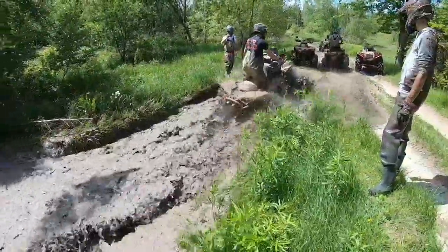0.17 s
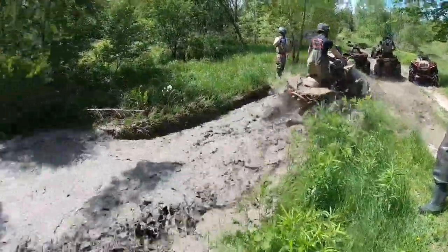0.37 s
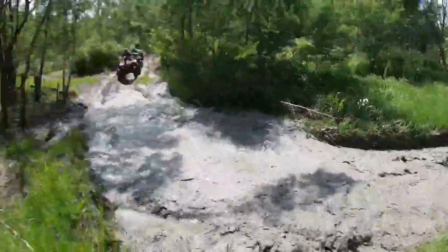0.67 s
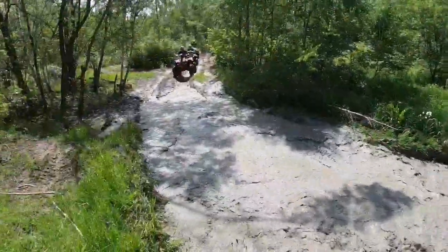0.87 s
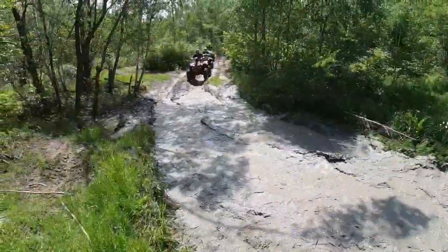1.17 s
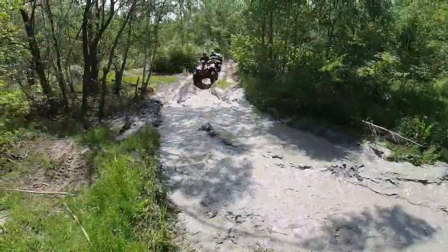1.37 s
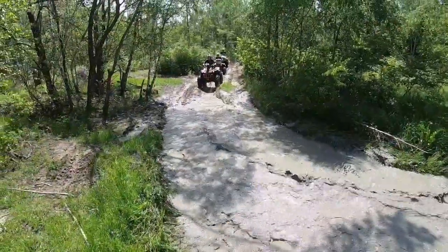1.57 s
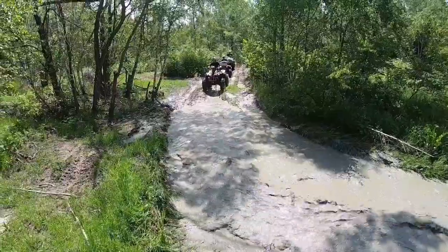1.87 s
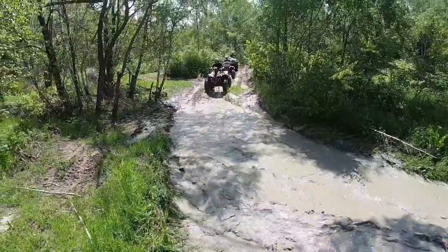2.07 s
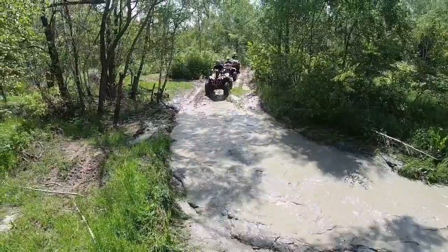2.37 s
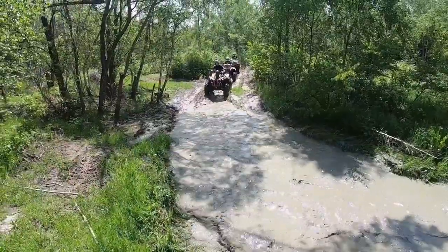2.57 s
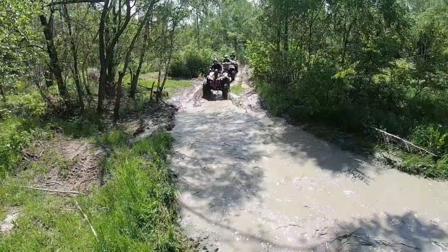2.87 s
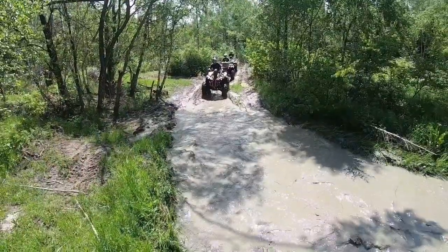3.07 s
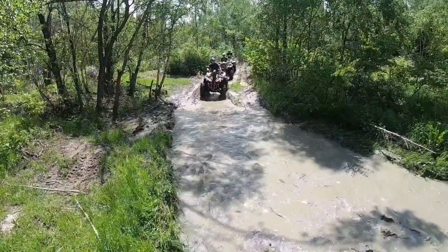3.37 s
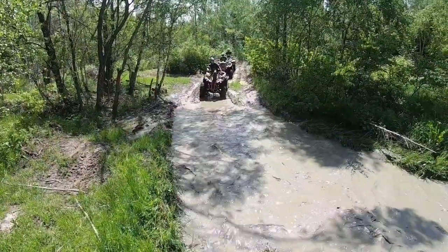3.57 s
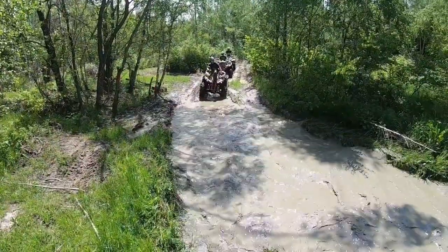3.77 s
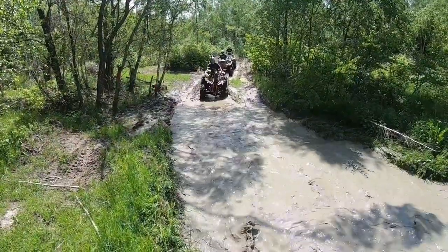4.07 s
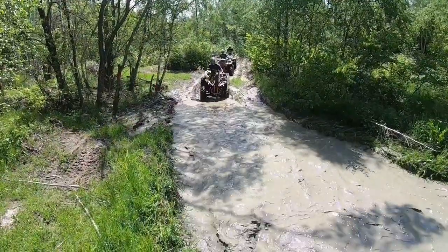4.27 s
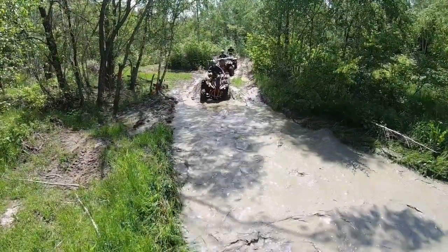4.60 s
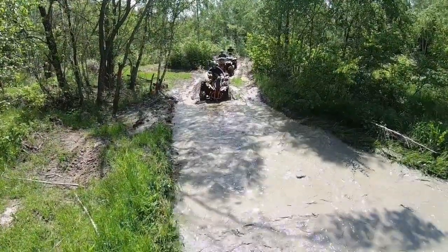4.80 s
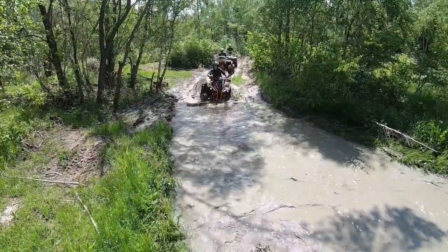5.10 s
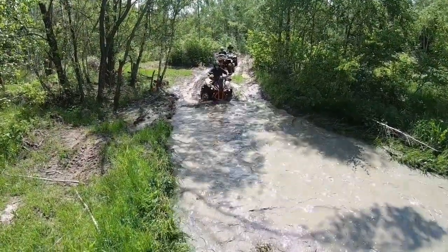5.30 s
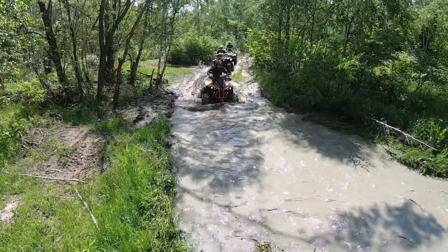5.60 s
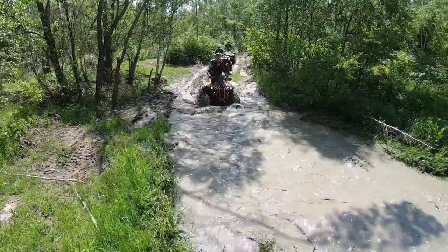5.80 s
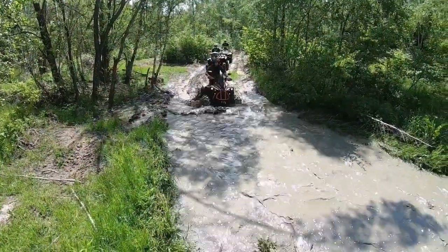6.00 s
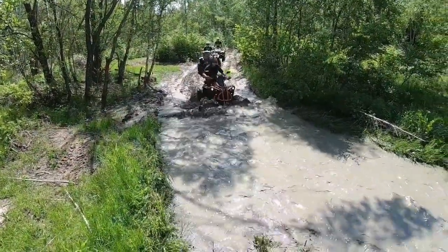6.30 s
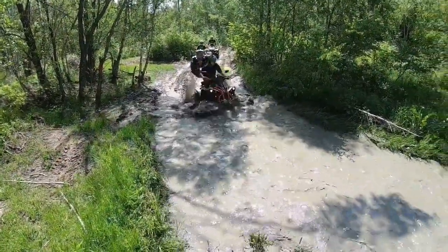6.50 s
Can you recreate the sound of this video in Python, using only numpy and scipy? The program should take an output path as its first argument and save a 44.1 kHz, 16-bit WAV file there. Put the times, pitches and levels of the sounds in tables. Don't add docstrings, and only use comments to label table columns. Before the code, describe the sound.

Heard through a small stereo camera: one twin-cylinder quad climbs in pitch to a cracking bark, then lets off and settles. Several engines lump along together, deep and fluttering, with missed beats, brief throttle blips and faint bright valve ticks. Near the end the approaching quad revs in waves and charges, its exhaust growing raspy as wheels churn mud and spray. Open air, only slight echoes from ground and trees.

```python
import sys
import numpy as np
from scipy import signal
from scipy.fft import rfft, irfft
from scipy.io import wavfile
from scipy.ndimage import uniform_filter1d

SR = 44100
rng = np.random.default_rng(int(sys.argv[2]) if len(sys.argv) > 2 else 0)


def file_out(sig):
    cols = np.atleast_2d(sig).T
    lim = np.clip(cols, -1, 1)
    pcm = np.round(lim * 32767).astype(np.int16)
    wavfile.write(sys.argv[1], SR, pcm)


def linear_from_db(decibels):
    return 10 ** (np.asarray(decibels, float) / 20)


N = 293265

# frequency in Hz, level in dB per Hz.
EXHAUST_SPECTRUM = [(15, -80), (25, -37.5), (56, 4), (107, 2), (195, 0.5), (237, -14.5), (301, -7.5),
                    (340, -18.5), (472, -18.5), (619, -45.5), (900, -39), (1170, -59), (1980, -120)]
# time in seconds, roughness from 0 to 1.
ROUGHNESS = [(0, .05), (.55, .05), (.7, .1), (1.0, .11), (2.55, .11), (2.8, .13), (2.92, .07), (3.15, .07),
             (3.3, .14), (3.6, .15), (3.8, .11), (4.15, .1), (4.3, .11), (4.8, .07), (5.35, .06),
             (5.5, .09), (6.0, .08), (6.3, .06), (6.65, .05)]


def rms_one(x):
    return x / np.sqrt(np.mean(x ** 2) + 1e-20)


def evened(x):
    return x / np.sqrt(uniform_filter1d(x ** 2, size=9000) + 1e-20)


def in_time(rows):
    s, *columns = np.transpose(rows)
    return [np.interp(np.arange(N) / SR, s, c) for c in columns]


def curve(rows):
    return in_time(rows)[0]


def at_hz(points, hz):
    known_hz, value = np.array(points).T
    return np.interp(np.log(hz), np.log(known_hz), value)


def drift(rate):
    r = np.exp(-80 * np.pi * rate / SR)
    slow = signal.lfilter([1], [1, -2 * r, r * r], rng.standard_normal(N // 40 + 2002))[2000:]
    return np.interp(np.arange(N) / 40, np.arange(len(slow)), rms_one(slow))


def butter(x, hz, kind, order=2):
    return signal.sosfilt(signal.butter(order, hz, kind, fs=SR, output="sos"), x)


def resonance(x, hz, width):
    r = np.exp(-np.pi * width / SR)
    feedback = [1, -2 * r * np.cos(2 * np.pi * hz / SR), r * r]
    return signal.lfilter(np.array([1, 0, -1]) * (1 - r * r) / 2, feedback, x + 1e-18)


def causal_colour(x, spectrum):
    size = 2 ** 15
    hz = np.maximum(np.arange(size // 2 + 1) * SR / size, 1)
    cepstrum = irfft(np.log(linear_from_db(at_hz(spectrum, hz))))
    cepstrum[1:size // 2] *= 2
    cepstrum[size // 2 + 1:] = 0
    return signal.fftconvolve(x, irfft(np.exp(rfft(cepstrum)))[:size // 2])[:N]


def band_rms(x, low_hz, high_hz):
    return np.std(butter(np.mean(x, axis=0), [low_hz, high_hz], "band", order=4))


def mist(level_db):
    mid, side = butter(rng.standard_normal((2, N)), [9800, 14300], "band", order=4)
    return linear_from_db(level_db + 1.5 * drift(20)) * rms_one(mid + .65 * side * [[1], [-1]])


def hiss(puffs, mud_db, spray_db, patchy_db, gate):
    # frequency in Hz, level in dB per Hz.
    hiss_spectrum = [(350, -29), (600, -2.5), (719, -2), (872, -9), (948, -4.5), (1100, -12), (1220, -4.5),
                     (1500, -5), (1910, -7.5), (2260, -6.5), (2490, -11.5), (2840, -7.5), (3700, -15),
                     (6210, -12.5), (8500, -12), (10700, -26.5), (13900, -57), (22000, -120)]
    # frequency in Hz, left-right likeness up to 1.
    likeness = [(60, 0.98), (130, 0.99), (260, 0.99), (540, 0.37), (1130, 0.42), (2360, 0.4), (4910, 0.18),
                (7500, 0.3), (10200, 0.24)]
    # frequency in Hz, left minus right in dB.
    left_lean = [(60, -1.0), (140, -0.5), (330, 0.5), (780, -1), (1840, -1.2), (4340, 2.7), (10200, -0.5)]
    mud, spray, together = 0, 0, drift(18)
    edges = 560 * 2 ** np.arange(0, 4.5, 1 / 3)
    white = rng.standard_normal((2, 2, N))
    for k, (low, high) in enumerate(zip(edges, edges[1:])):
        mid, side = butter(white[k % 2], [low, high], "band")
        hz = np.sqrt(low * high)
        alike = np.clip(at_hz(likeness, hz), -.95, .95)
        lean = linear_from_db(at_hz(left_lean, hz) * 0.43 * np.array([[1], [-1]]))
        gain = linear_from_db(at_hz(hiss_spectrum, hz) + patchy_db * (0.83 * together + drift(39)))
        band = gain * lean * (np.sqrt(1 + alike) * mid + np.sqrt(1 - alike) * side * [[1], [-1]])
        upper = np.clip(np.log2(hz / 3500), 0, 1)
        mud = mud + (1 - upper) * band
        spray = spray + upper * band
    mud, spray = butter(np.array([mud, spray]), 10800, "low", order=12)
    swell = 1 + gate * puffs
    both = linear_from_db(mud_db) * mud / band_rms(mud, 814, 6800)
    both = both + linear_from_db(spray_db) * spray / band_rms(spray, 5000, 11000)
    return both * swell / np.sqrt(np.mean(swell ** 2))


def from_the_right(pair):
    # time in seconds, share from 0 to 1.
    aside_rows = [(0, 0), (.55, 0), (.85, 1), (4.5, 1), (5.9, .6), (6.2, 0), (6.65, 0)]
    lag_s, lean_db = .00038, -6.5
    aside = curve(aside_rows)
    late = np.interp(np.arange(N) - np.round(aside * lag_s * SR), np.arange(N), pair[0])
    return np.array([late, pair[1]]) * linear_from_db(lean_db * aside * [[.5], [-.5]])


def ticks():
    # first tick in seconds, number of ticks, seconds between ticks, peak in dB.
    spells = [
        (1.2384, 1, .096, -30.5),
        (2.3785, 2, .09, -38),
        (2.5985, 1, .096, -41.5),
        (2.9514, 1, .096, -34),
        (3.481, 1, .096, -46.5),
        (3.6107, 13, .0955, -40),
        (5.238, 6, .0985, -44),
        (6.287, 1, .096, -45),
    ]
    spread_db, length = 2.5, 90
    clicks = np.zeros(N)
    for first, count, gap, db in spells:
        for s in first + gap * np.arange(count):
            start = round(s * SR)
            peak = linear_from_db(db + 1.5 + spread_db * rng.normal())
            clicks[start:start + length] = peak * rng.standard_normal(length)
    return butter(clicks, [7800, 9400], "band", order=4) * linear_from_db([[-6], [2]])


def heat_shield():
    # frequency in Hz, width in Hz, level in dB.
    modes = [(2380, 230, 0), (3100, 200, 1), (4150, 450, -9)]
    # time in seconds, level in dB.
    shake = [(0, -40.5), (.1, -43.5), (.14, -32.5), (.22, -35.5), (.27, -38), (.34, -31.5), (.47, -34),
             (.62, -38), (.7, -48), (.78, -55)]
    out = 0
    for hz, width, db in modes:
        knocks = rng.standard_normal(SR) * linear_from_db(3 * drift(35)[:SR])
        out = out + linear_from_db(db) * resonance(knocks, hz, width)
    return linear_from_db(curve(shake)) * np.pad(rms_one(out), (0, N - SR))


def rasp(pulses, shell_modes, blowdown_s, snap_db):
    decay = np.exp(-1 / (blowdown_s * SR))
    blowdown = signal.lfilter([1], [1, -decay], pulses) * rng.standard_normal(N)
    crack = rms_one(blowdown) + linear_from_db(snap_db) * rms_one(pulses)
    shell = 0
    for k, (hz, width, db) in enumerate(shell_modes):
        shell = shell + linear_from_db(db) * (-1) ** k * resonance(crack, hz, width)
    return evened(butter(shell, [650, 4800], "band"))


def misfires():
    # time in seconds, depth in dB.
    holes = [(1.065, -8), (1.166, -18), (1.221, -5), (1.373, -4.5), (1.976, -9), (2.656, -5), (2.715, -11),
             (2.903, -6), (3.207, -7), (3.546, -14), (3.657, -13), (3.756, -7), (4.009, -8), (4.814, -4),
             (4.85, -3), (5.303, -3)]
    t = np.arange(N) / SR
    return sum(db * np.exp(-((t - s) / .0053) ** 2) for s, db in holes)


def speed(rows):
    flywheel_s = .035
    return uniform_filter1d(curve(rows), size=int(flywheel_s * SR))


def firings(cycle_hz, rough, second_db):
    turns, out = np.cumsum(cycle_hz) / SR, np.zeros(N + 2)
    for start, level_db in ((0, 0), (3 / 8, second_db)):
        at = np.interp(np.arange(1, turns[-1]) - 1 + start + 0.37, turns, np.arange(N))
        chance = rng.standard_normal((500, 2))[:len(at)]
        i = at.astype(int)
        at = np.clip(at + chance[:, 0] * rough[i] * .002 * SR, 0, N - 1)
        size = linear_from_db(level_db + 8 * rough[i] * chance[:, 1]) / np.sqrt(cycle_hz[i])
        np.add.at(out, at.astype(int), size)
    return out[:N]


def orders(cycle_hz, rough, boom_db, pipe, waves, trim, twin_share, head_start_s, second_db):
    cycle_hz, rough, boom_db = cycle_hz[::10], rough[::10], boom_db[::10]
    turns, out = np.cumsum(cycle_hz) * 10 / SR, 0
    second_db = second_db - 4.5 * np.clip((26 - cycle_hz) / 4, 0, 1)
    for k, scatter in zip(range(1, 38), rng.normal(0, 1.2, 37)):
        hz = k * cycle_hz
        twin = abs(1 + linear_from_db(second_db) * np.exp(-2j * np.pi * k * (twin_share - head_start_s * cycle_hz)))
        opening_db = 1.5 * np.log2(cycle_hz / 30) * np.maximum(np.log2(hz / 64), 0)
        trim_db = trim[k - 1] if k <= len(trim) else 0
        level_db = at_hz(pipe, hz) + trim_db + opening_db + boom_db * (k < 4) - 40 * (hz > 920)
        for wave_hz, width, db in waves:
            level_db = level_db + db / (1 + (2 * (hz - wave_hz) / width) ** 2)
        flutter_db = (8 + .6 * k) * rough * drift(11)[::10]
        wobble = .35 * k * rough * drift(8)[::10]
        phase = 2 * np.pi * k * turns - .08 * k * k + .75 * scatter + wobble
        out = out + twin * linear_from_db(level_db + flutter_db) * np.sin(phase)
    return evened(signal.resample_poly(out, 10, 1)[:N])


def idling_bikes():
    idle_hz = (10.4, 12.3)
    idle = sum(firings(hz * (1 + .02 * drift(.7)), np.full(N, .3), second_db=-3) for hz in idle_hz)
    for delay_s in (.0071, .0113, .0167):
        lag = int(delay_s * SR)
        idle = signal.lfilter(np.r_[-.6, np.zeros(lag - 1), 1], [1], idle)
    return rms_one(causal_colour(idle, EXHAUST_SPECTRUM))


def coming_bike(rough):
    # time in seconds, engine cycles per second.
    revs = [(.7, 18.8), (1.0, 19.2), (1.12, 19.45), (1.35, 18.8), (1.7, 19.9), (1.9, 20.4), (2.1, 20.1),
            (2.5, 21), (2.62, 20.5), (2.76, 19), (2.9, 17.6), (3.09, 19), (3.2, 19.5), (3.42, 20.1),
            (3.52, 20.4), (3.69, 19.5), (3.8, 19.3), (3.9, 19), (4.0, 18.2), (4.1, 17.1), (4.24, 20.3),
            (4.62, 22.1), (4.85, 29), (5.0, 31.3), (5.12, 32.3), (5.3, 30.8), (5.43, 27.8), (5.55, 29.2),
            (5.77, 35.4), (5.99, 31), (6.25, 43.8), (6.65, 59)]
    # frequency in Hz, level in dB.
    pipe = [(30, -41), (50, -8), (90, 5), (160, 3), (210, -2.5), (300, -8.5), (400, -17.5), (650, -39)]
    # frequency in Hz, width in Hz, lift in dB.
    waves = [(180, 34.5, 6.2), (210.2, 20, 4.65), (289, 70, 2.6), (394, 130, 2.5), (540, 51, 9.2),
             (646, 85, 11.3)]
    trim = [11, 1.1, -3.5, 8.5, 0.9, -1.5, 2.5, -0.26, 1.4, -1.5, -0.2, 1.5, -2.5, -1, 6.5, -6, .1, 2.8, -2,
            4.5]
    # frequency in Hz, width in Hz, level in dB.
    shell = [(1050, 400, -4), (1420, 270, 0.5), (2300, 120, -5), (3140, 990, -13.5)]
    # time in seconds, level in dB.
    rasp_rows = [(5.45, -54), (5.75, -41.5), (5.95, -48), (6.15, -41), (6.35, -36.5), (6.5, -29.5),
                 (6.65, -24.5)]
    cycle_hz = speed(revs)
    tone = orders(cycle_hz, rough, np.zeros(N), pipe, waves, trim,
                  twin_share=.385, head_start_s=.0004, second_db=-1.5)
    pulses = firings(cycle_hz, rough, second_db=-0.5)
    cracks = linear_from_db(curve(rasp_rows)) * rasp(pulses, shell, blowdown_s=.011, snap_db=-4)
    return tone, pulses, cracks


def leaving_bike(rough):
    # time in seconds, engine cycles per second.
    revs = [(0, 27), (.19, 31.9), (.41, 39.4), (.51, 42), (.555, 41), (.59, 35.5), (.66, 31.6), (.79, 27.2),
            (.95, 22), (1.22, 21.4), (1.5, 23.8), (1.66, 22.6), (1.9, 17.6), (2.25, 14.9), (2.55, 14.8),
            (2.84, 17.2), (2.96, 22.8), (3.15, 23.1), (3.6, 17.7), (3.85, 25), (4.0, 24.6), (4.08, 23.3),
            (4.2, 16), (4.4, 15)]
    # time in seconds, lift in dB.
    boom = [(0, -4), (.55, 0), (.59, 1), (.8, 2), (1.6, 1), (1.9, -6), (3.5, -8), (3.9, -5), (4.1, -19),
            (6.65, -11)]
    # frequency in Hz, level in dB.
    pipe = [(30, -35), (50, -4.5), (75, 9), (120, 2.5), (200, -1), (260, -11.5), (400, -20.5), (600, -27),
            (690, -42)]
    # frequency in Hz, width in Hz, lift in dB.
    waves = [(250.4, 12.3, 9.5), (309, 42, 5.5), (357, 30, 6.5), (385, 11, 1.5), (472, 22.6, 12.5),
             (563, 38, 8)]
    trim = [5, -4.5, -1.8, 1, -1, .1, 3, -8, 3, -1.5, -0.7, -26.5, -1.2, -5.5, 1.5, 1, 1, 4.3, 3.5, 5]
    # frequency in Hz, width in Hz, level in dB.
    shell = [(810, 290, -3), (1150, 240, 0.5), (1450, 350, -4), (1760, 830, -9), (2220, 300, -7)]
    # time in seconds, level in dB.
    rasp_rows = [(0, -60), (.12, -41), (.28, -35), (.34, -29.5), (.385, -25), (.44, -25.5), (.5, -28.5),
                 (.555, -32.5), (.575, -45), (.62, -50), (.7, -80), (.9, -90)]
    cycle_hz = speed(revs)
    tone = orders(cycle_hz, rough, curve(boom), pipe, waves, trim,
                  twin_share=.405, head_start_s=.0012, second_db=-3)
    pulses = firings(cycle_hz, rough, second_db=-4.5)
    cracks = linear_from_db(curve(rasp_rows)) * rasp(pulses, shell, blowdown_s=.016, snap_db=3)
    return tone, pulses, cracks


def exhaust(tone, beat_db, bark_db):
    # delay in seconds, left level in dB, right level in dB.
    echoes = [(.011, -14, -22), (.023, -24, -15), (.041, -18, -26)]
    split_hz = 340
    rush = rms_one(causal_colour(rng.standard_normal(N), EXHAUST_SPECTRUM))
    pipe = evened(tone) + linear_from_db(-16) * rush
    beat = butter(pipe, split_hz, "low", order=3)
    bark = butter(pipe + linear_from_db(-9) * rush, split_hz, "high", order=3)
    part = linear_from_db(beat_db) * evened(beat) + linear_from_db(bark_db) * evened(bark)
    both = part * linear_from_db([[-.3], [.3]])
    for delay_s, left_db, right_db in echoes:
        lag = int(delay_s * SR)
        both[:, lag:] -= linear_from_db([[left_db], [right_db]]) * part[:-lag]
    return both


def scene():
    # time in seconds, leaving bike in dB, coming bike in dB, idling bikes in dB.
    shares = [(0, 6, -22, -24), (.55, 10, -22, -14), (.7, 6, -8, -12), (.95, -2, -2, -10),
              (1.15, -5, 0, -10), (1.45, -2, 0, -10), (1.8, -7, 0, -10), (2.1, -9, 0, -10),
              (2.55, -9, 0, -11), (2.75, -2, -3, -9), (2.92, 3, -4, -12), (3.12, 3, -4, -12),
              (3.25, -2, -2, -9), (3.45, -7, 0, -8), (3.75, -11, 0, -10), (3.92, -4, -1, -11),
              (4.1, -2, -1, -11), (4.22, -6, 0, -11), (4.35, -14, 0, -10), (4.8, -20, 0, -14),
              (5.9, -30, 0, -15), (6.2, -30, 0, -20), (6.65, -30, 0, -20)]
    # time in seconds, level in dB.
    load = [(0, -31.5), (.42, -21.5), (.55, -29), (.59, -35), (.75, -33.5), (.95, -34.5), (1.1, -32.5),
            (1.22, -29.5), (1.35, -33), (1.5, -30.5), (1.8, -35.5), (2.78, -39.5), (2.9, -30),
            (3.13, -30.5), (3.3, -40.5), (3.6, -40.5), (3.95, -50.5), (4.07, -44), (4.12, -29.5),
            (4.25, -32), (4.56, -37), (4.96, -24), (5.2, -31.5), (5.32, -30), (5.43, -39), (5.5, -31),
            (5.7, -23.5), (5.93, -31), (6.1, -20.5), (6.28, -22.5), (6.65, -18.5)]
    # time in seconds, level in dB.
    churn = [(0.0, -48.5), (0.02, -46), (0.31, -44.5), (0.35, -40.5), (0.37, -44.5), (0.96, -50),
             (1.2, -48.5), (1.68, -52.5), (1.89, -49), (2.15, -53), (2.98, -47), (3.65, -52.5),
             (6.04, -53.5), (6.52, -41), (6.59, -43.5), (6.65, -37.5)]
    # time in seconds, level in dB.
    surge = [(0, -0.9), (.6, 0.2), (1.0, -1), (1.3, 0), (1.7, -1.5), (2.2, 0), (2.4, 2.5), (2.7, 0.9),
             (3.05, 0), (3.3, 1.5), (3.5, 0.6), (3.75, 3.5), (3.95, 2), (4.15, 2), (4.5, 1.1), (5.3, -1),
             (5.43, 0), (5.55, .5), (5.9, 0.5), (6.65, -2.5)]
    leaving_db, coming_db, idling_db = in_time(shares)
    rough, load_db, churn_db = curve(ROUGHNESS), curve(load), curve(churn)
    load_swing_db, churn_swing_db = load_db - load_db.mean(), churn_db - churn_db.mean()

    leaving_tone, leaving_pulses, leaving_cracks = leaving_bike(rough)
    coming_tone, coming_pulses, coming_cracks = coming_bike(rough)
    tone = linear_from_db(leaving_db) * leaving_tone + linear_from_db(coming_db) * coming_tone
    tone += linear_from_db(np.minimum(idling_db, -8)) * idling_bikes()
    pulses = linear_from_db(leaving_db) * leaving_pulses + linear_from_db(coming_db) * coming_pulses
    puffs = evened(np.abs(butter(pulses, 90, "low")))

    beat_db = -15 + curve(surge) + misfires() + 4 * rough * drift(6) + 0.22 * load_swing_db
    pipes = exhaust(tone, beat_db, bark_db=load_db + 3.5)
    metal = (leaving_cracks + coming_cracks + heat_shield()) * linear_from_db([[.3], [-.3]])
    mud_db = -41 + 0.83 * churn_swing_db + 0.16 * load_swing_db
    wet = from_the_right(hiss(puffs, mud_db, spray_db=churn_db - 0.5, patchy_db=1.0, gate=0.017))
    return pipes + metal + ticks() + wet + mist(-67.5 + 1.3 * churn_swing_db)


def thinned_top(x):
    # frequency in Hz, share dropped from 0 to 1.
    dropped = [(10200, 0), (10800, .4), (11300, .6), (11900, .42), (13900, .45), (14500, .8), (15200, .9)]
    hz, s, cells = signal.stft(x, SR, nperseg=1024)
    spell = np.exp(.2 * drift(4)[np.minimum((s * SR).astype(int), N - 1)])
    dice = rng.random((len(hz) // 4 + 1, len(s) // 3 + 1))
    dice = dice.repeat(4, axis=0).repeat(3, axis=1)[:len(hz), :len(s)]
    kept = dice > at_hz(dropped, hz + 1)[:, None] * spell
    return signal.istft(cells * kept, SR, nperseg=1024)[1][:, :N]


def band_limit(x):
    return signal.sosfilt(signal.butter(12, 15130, fs=SR, output="sos"), x)


def record(dry):
    limited = 1.194 * np.tanh(dry / 1.206)
    return band_limit(thinned_top(limited))


dry = scene()
out = record(dry)
file_out(out)
```